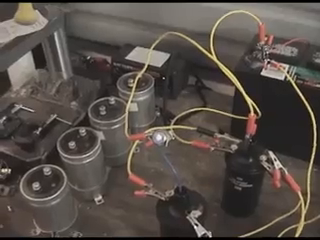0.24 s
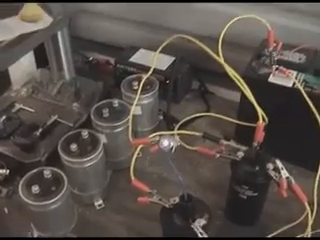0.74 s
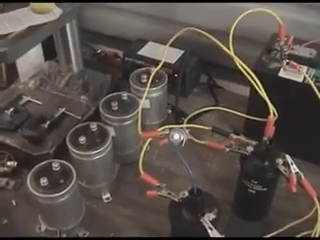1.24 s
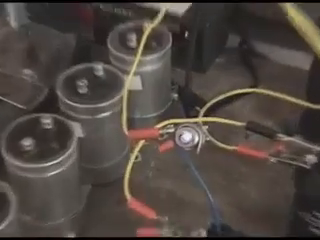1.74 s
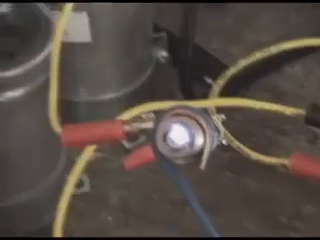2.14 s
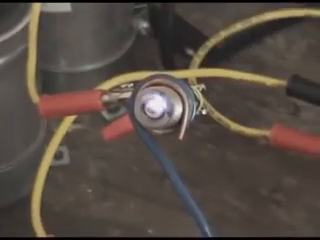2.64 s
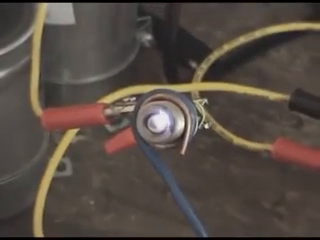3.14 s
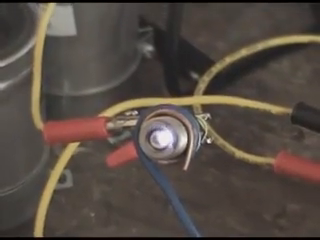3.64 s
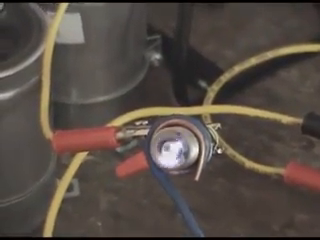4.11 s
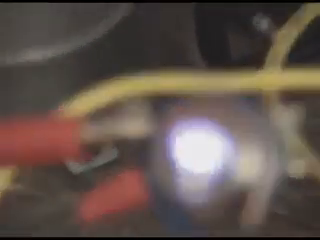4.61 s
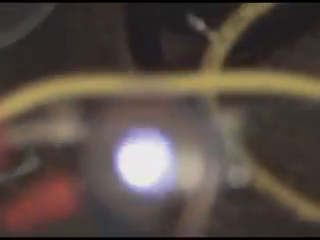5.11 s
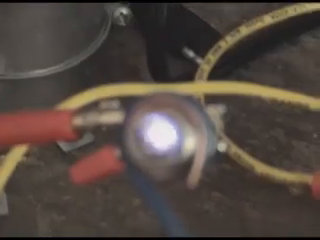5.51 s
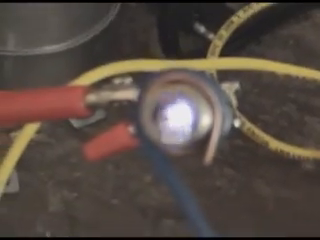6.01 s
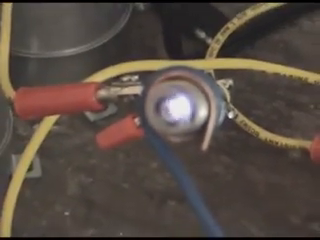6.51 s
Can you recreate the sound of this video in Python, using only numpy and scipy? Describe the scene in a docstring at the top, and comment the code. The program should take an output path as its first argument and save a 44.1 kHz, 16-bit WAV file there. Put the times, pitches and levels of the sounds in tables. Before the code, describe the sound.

Close-up electrical arc buzzing so fast it becomes a shrill, rough whine with sizzling hiss, briefly dulling and cutting out midway, then resuming.

```python
"""Spark train of an ignition coil

An ignition coil fires a spark plug on a workbench nearly 7000 times a second, heard from close by.
Sines at the spark rate and its octave make a piercing, unsteady whine; noise pulsed by each spark, a bright hiss.
Bench resonances and decaying room echoes colour it, over a faint wavering note, room noise and hum.
The treble dulls briefly, the whole sound cuts out for a moment, and one soft bump follows."""
import sys
import numpy as np
from scipy import signal
from scipy.fft import rfft, irfft, next_fast_len
from scipy.io import wavfile
from scipy.ndimage import map_coordinates

SR = 44100
rng = np.random.default_rng(int(sys.argv[2]) if len(sys.argv) > 2 else 0)


def generate_wav(signal):
    """Clip the signal to [-1, 1] and save it as 16-bit WAV at the path in sys.argv[1]."""
    frames = np.transpose(np.atleast_2d(signal))
    scaled = np.clip(frames, -1, 1) * 32767
    pcm = np.round(scaled).astype(np.int16)
    wavfile.write(sys.argv[1], SR, pcm)


N = 298116  # length [samples]
T = np.arange(N) / SR  # time [s]


def amp(db):
    """Amplitude ratio of a level: 20 dB for each factor of ten."""
    return 10 ** (np.asarray(db) / 20)


def unit(x):
    """Normalisation to an rms of 1."""
    return x / np.sqrt(np.mean(x ** 2) + 1e-20)


def along(points, hz):
    """Linear interpolation of (frequency [Hz], value) points on a logarithmic frequency axis."""
    f, value = np.transpose(points)
    return np.interp(np.log(hz + 1), np.log(f), value)


def wobble(rate):
    """Smooth random modulation of rms 1: a spline through random knots, rate of them a second."""
    knots = rng.standard_normal(N // 2)
    return unit(map_coordinates(knots, [np.arange(N) * rate / SR], mode="wrap"))


def filtered(x, response):
    """Linear filtering: the spectrum of x multiplied by a response of frequency."""
    m = next_fast_len(N + SR // 2)
    f = np.fft.rfftfreq(m, 1 / SR)
    return irfft(rfft(x, m) * response(f), m)[..., :N]


def placed(x, wet_db, side_db, left_db):
    """Reverberation by convolution with decaying noise; returns a stereo pair of joint rms 1."""
    # decay of the room's echoes: (frequency [Hz], time to fall by 60 dB [s])
    room = [(200, 0.068), (3000, 0.13), (14000, 0.085)]
    hz, t, z = signal.stft(rng.standard_normal((2, SR // 3)), SR, nperseg=256)
    decay = amp(-60 * t / along(room, hz)[:, None])
    tail = signal.istft(z * decay, SR, nperseg=256)[1]
    echo, across = signal.fftconvolve(x[None], tail, axes=1)[:, :N]
    mid = unit(unit(x) + amp(wet_db) * unit(echo))
    side = amp(side_db) * unit(across)
    return unit(np.array([amp(left_db) * (mid + side), mid - side]))


def spark_count(whine_db):
    """Phase as the integral of a wandering rate: the number of sparks fired so far."""
    start_hz, drift_hz_per_s = 6757, 8  # the coil driver creeps upward as it runs
    sag_hz_per_db = 4  # a stronger arc slows the driver a little
    rate = start_hz + drift_hz_per_s * T - sag_hz_per_db * (whine_db - whine_db.mean())
    wander = 52 * wobble(170) + 95 * wobble(1800)  # slow and fast unsteadiness [Hz rms]
    return np.cumsum(rate + wander) / SR


def whine(count, order, flutter, top_hz, wet_db, side_db, left_db):
    """Harmonic of a periodic pulse train, amplitude-modulated as the arc moves over the electrodes."""
    tone = np.sin(2 * np.pi * order * count)
    tone = tone * (1 + flutter * wobble(750))
    tone = filtered(tone, lambda f: 1 / np.sqrt(1 + (f / top_hz) ** 160))  # steep low-pass
    return placed(tone, wet_db, side_db, left_db)


def spits(rate, life, size):
    """Shot process: a gain that jumps at random, rate a second, each jump decaying by e in life [s]."""
    jumps = (rng.random(N) < rate / SR) * rng.exponential(size, N)
    return 1 + signal.lfilter([1], [1, -np.exp(-1 / (life * SR))], jumps)


def hiss(count):
    """Pulsed noise: fresh noise jumps up at each spark and decays until the next, coloured by the bench."""
    # spectrum of one spark: (frequency [Hz], relative level per Hz [dB])
    snap = [(150, -38), (400, -28.5), (700, -24.5), (1100, -13.5), (1600, -14), (2200, -9.5), (3500, -11),
            (4600, -6.5), (5400, -0.5), (7300, 2), (10000, 1), (13200, 0), (14000, -20), (15000, -6.5)]
    # peaks and notches from the plug, cans and bench top: (centre [Hz], half-width [Hz], gain [dB])
    bench = [(1271, 91, 3.5), (1540, 150, -6.5), (1715, 92, 5.5), (2610, 290, 2), (3250, 200, 3.5),
             (4080, 97, 5.5), (4634, 73, -12.5), (5700, 108, 5), (6250, 93, -3.5), (7680, 100, -2),
             (7820, 80, 3.5), (8540, 200, 4.5), (8750, 140, -27), (9400, 250, 1.5), (9840, 93, -14),
             (11340, 110, -6)]

    def spectrum(f):
        bench_db = sum(db * np.exp(-((f - hz) / width) ** 2) for hz, width, db in bench)
        return amp(along(snap, f) + bench_db)

    snaps = rng.standard_normal(N) * np.exp(-(count % 1) / 2)
    coloured = unit(filtered(snaps, spectrum))
    sharp = filtered(coloured, lambda f: 1 / (1 + (5000 / (f + 1)) ** 10))  # above about 5 kHz
    body = coloured - sharp
    # the arc spits: the sharp top crackles in full, the body a little less
    crackle = spits(rate=420, life=.0009, size=.52) * amp(.55 * wobble(70))
    top = placed(sharp * crackle, wet_db=-11.0, side_db=-12.5, left_db=1.5)
    bottom = placed(body * crackle ** 0.81, wet_db=-8, side_db=-20.5, left_db=1.0)
    return np.std(sharp) * top + np.std(body) * bottom


def arc():
    """Superposition of whine, octave and hiss, all driven by one train of sparks."""
    # strength of the whine before a fixed lift of 1.7 dB: (time [s], level [dB])
    strength = [(0.1, -25.5), (0.6, -28), (0.85, -26), (1.35, -25.5), (1.6, -29.5), (1.8, -26.5),
                (2.6, -28.5), (4.0, -29.5), (4.25, -26), (4.85, -27), (5.15, -29.3), (6.6, -28.5)]
    octave_db, hiss_db = -30, -25.5
    waver_db, waver_per_s = 0.06, 3.93  # slight waver shared by octave and hiss [dB rms, knots/s]
    whine_db = np.interp(T, *np.transpose(strength))
    count = spark_count(whine_db)
    first = whine(count, order=1, flutter=0.13, top_hz=13750, wet_db=-6, side_db=-14.5, left_db=2.5)
    second = whine(count, order=2, flutter=.22, top_hz=13900, wet_db=-8, side_db=-42, left_db=-0.5)
    upper = amp(octave_db) * second + amp(hiss_db) * hiss(count)
    return amp(whine_db + 1.7) * first + upper * amp(waver_db * wobble(waver_per_s))


def ring():
    """Random frequency modulation: a faint, rough note far below the whine that never holds its pitch."""
    centre_hz, level_db = 2529, -46.5
    hz = centre_hz + 69.95 * wobble(60) + 130 * wobble(900)  # wander [Hz rms]
    tone = np.sin(2 * np.pi * np.cumsum(hz) / SR) * amp(2.14 * wobble(120))
    return amp(level_db) * placed(tone, wet_db=-9, side_db=-27, left_db=-2)


def room_noise():
    """Diffuse field: noise whose left-right correlation depends on frequency, with an uneven rumble."""
    # spectrum of the room noise before the rumble is lifted: (frequency [Hz], relative level per Hz [dB])
    air_spectrum = [(10, 22), (25, -12), (45, -6.5), (75, -4.5), (180, -2), (280, 1.5), (600, -2),
                    (1200, -1), (2200, -3), (5000, -51)]
    # likeness of left and right: (frequency [Hz], correlation [0-1])
    likeness = [(30, 0.88), (120, 0.16), (500, 0.032), (2000, 0.046)]
    air_db = -47  # level before the rumble is lifted
    lift_db, swing_db, swing_per_s = 5.5, 2.0, 8.3  # rumble: mean lift, random swing [dB rms, knots/s]

    def mid_and_side(f):
        # mid and side powers of cos^2 and sin^2 give the wanted correlation
        turn = np.arccos(np.clip(along(likeness, f), -1, 1)) / 2
        return amp(along(air_spectrum, f)) * [np.cos(turn), np.sin(turn)]

    mid, side = filtered(rng.standard_normal((2, N)), mid_and_side)
    air = unit(np.array([mid + side, mid - side]))
    rumble = filtered(air, lambda f: 1 / (1 + (f / 110) ** 4))
    lift = amp(lift_db + swing_db * wobble(swing_per_s))
    return amp(air_db) * (air + rumble * (lift - 1))


def hum():
    """Additive synthesis of the equipment's hum: sines slightly unsteady in level and phase."""
    # partials of the hum: (frequency [Hz], mean level [dB rms])
    partials = [(120, -69), (150, -75.5), (240, -70.5), (270, -67.5), (290, -68.5), (300, -75), (375, -69),
                (450, -72.5), (525, -72.5), (600, -72), (825, -69.5)]
    total = 0
    for hz, db in partials:
        level = amp(db + 0.42 * wobble(1.86))
        phase = 2 * np.pi * hz * T + 0.42 * wobble(3.1)
        total = total + level * unit(np.sin(phase))
    return total


def treble_dulled(x):
    """Time-varying filtering by crossfade: the treble dulls and clears again in one smooth swell."""
    # response of the dull part of the crossfade: (frequency [Hz], gain [dB])
    muffle = [(1500, -3), (2500, -5), (4000, -0.5), (6800, -1), (8200, -3), (10000, -5), (12000, -12),
              (13500, -34)]
    middle_s, width_s, depth = 3.89, 0.19, 0.82  # width to 1/e on either side; depth 0-1
    dullness = depth * np.exp(-((T - middle_s) / width_s) ** 2)
    muffled = filtered(x, lambda f: amp(along(muffle, f)))
    return (1 - dullness) * x + dullness * muffled


def cut_out():
    """Gain gating: the level drops at once, fades further to near silence and snaps back."""
    cut_s, return_s, switch_s = 4.1022, 4.1345, 0.001  # start of the drop and of the return; ramp time
    drop_db, fade_db_per_s, floor_db = 10, 1800, -63
    inside = np.clip(np.minimum(T - cut_s, return_s + switch_s - T) / switch_s, 0, 1)
    fade_db = np.maximum(-drop_db - fade_db_per_s * (T - cut_s), floor_db)
    return amp(inside * fade_db)


def bump():
    """Band-limited noise under a Gaussian envelope: one soft, low bump."""
    middle_s, width_s = 4.19, 0.026  # width to 1/e on either side
    level_db, centre_hz = -50, 293  # level at the middle of the bump
    noise = rng.standard_normal(N)
    body = unit(filtered(noise, lambda f: np.exp(-((f - centre_hz) / 110) ** 2)))
    return amp(level_db) * np.exp(-((T - middle_s) / width_s) ** 2) * body


def scene():
    """Superposition of spark sound and lower note, their treble dulled briefly, with noise, hum and bump."""
    return treble_dulled(arc() + ring()) + room_noise() + hum() + bump()


def record(dry):
    """Soft saturation rounds the tallest peaks; then come the cut-out and a sharp band limit."""
    top_hz = 15100
    rounded = dry / (1 + (dry / .4) ** 6) ** (1 / 6)  # peaks approach 0.4
    return filtered(rounded * cut_out(), lambda f: f < top_hz)


dry = scene()
out = record(dry)
generate_wav(out)
```